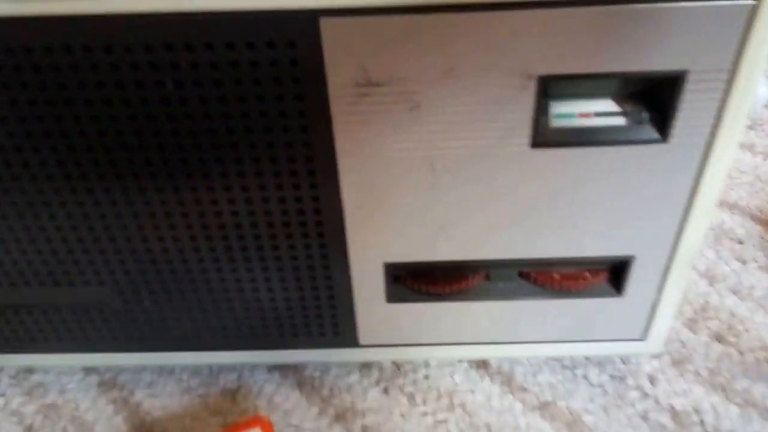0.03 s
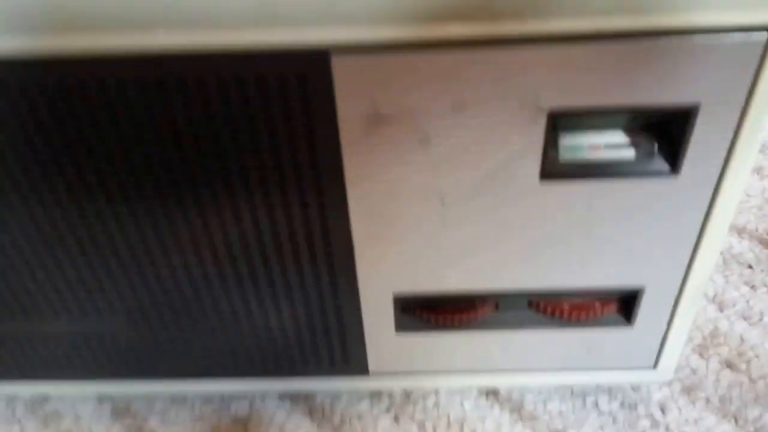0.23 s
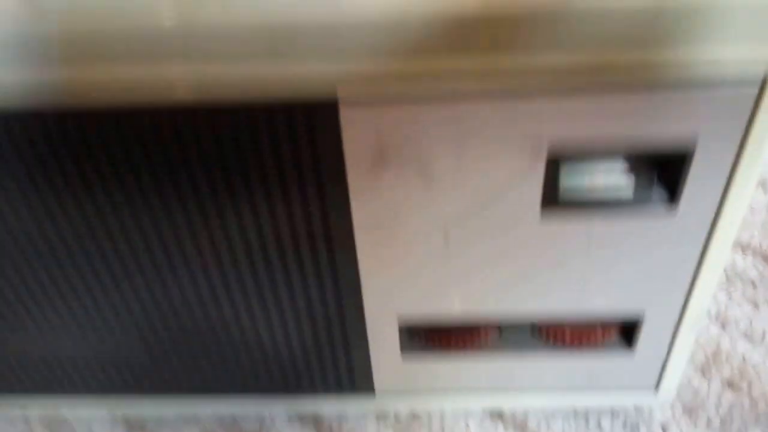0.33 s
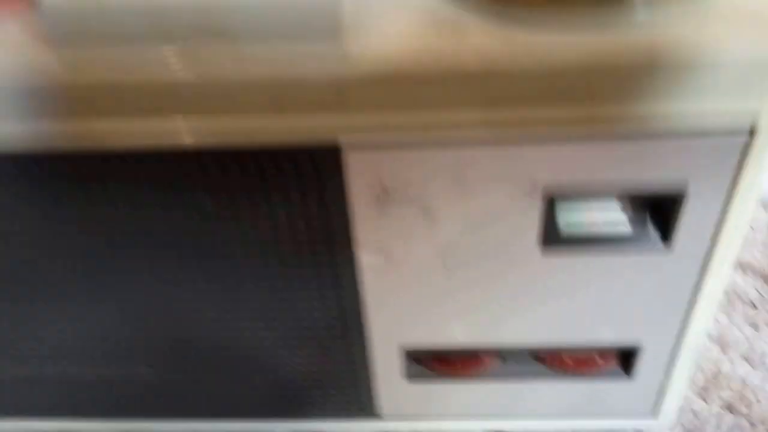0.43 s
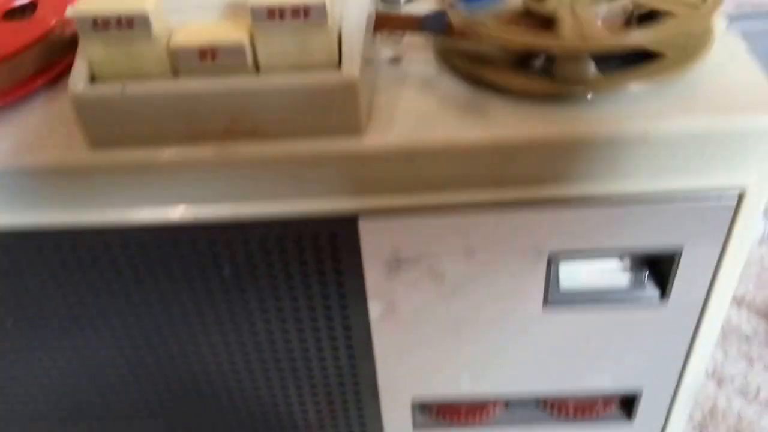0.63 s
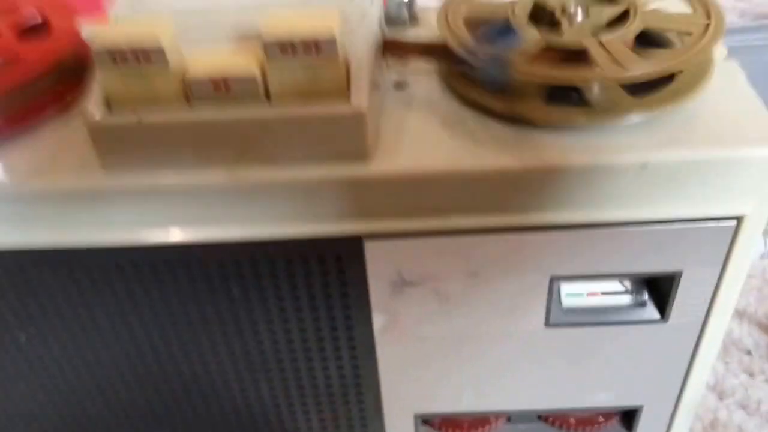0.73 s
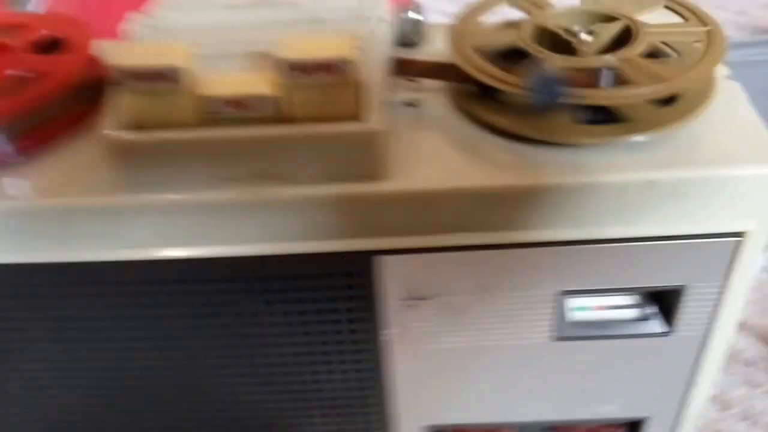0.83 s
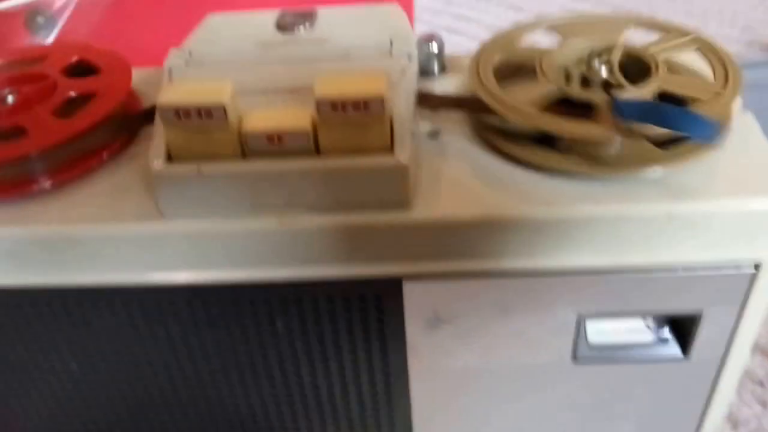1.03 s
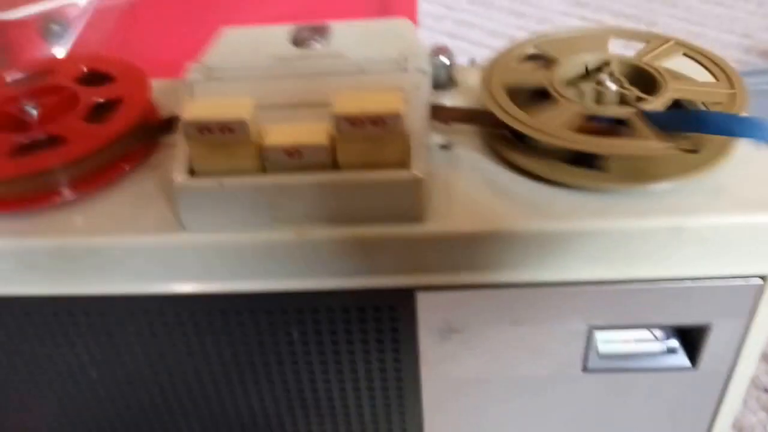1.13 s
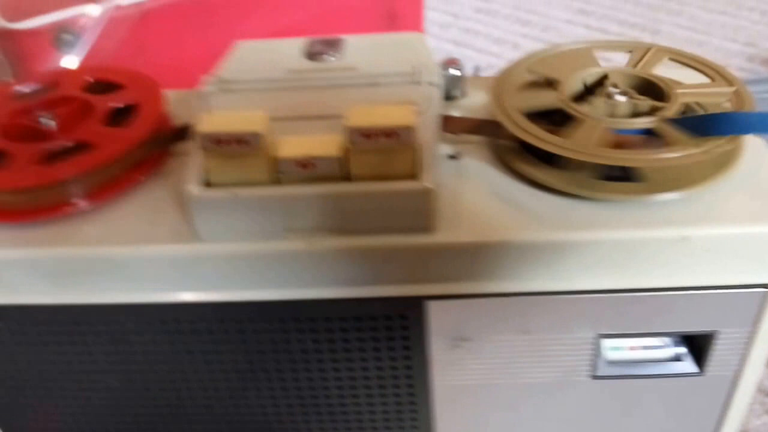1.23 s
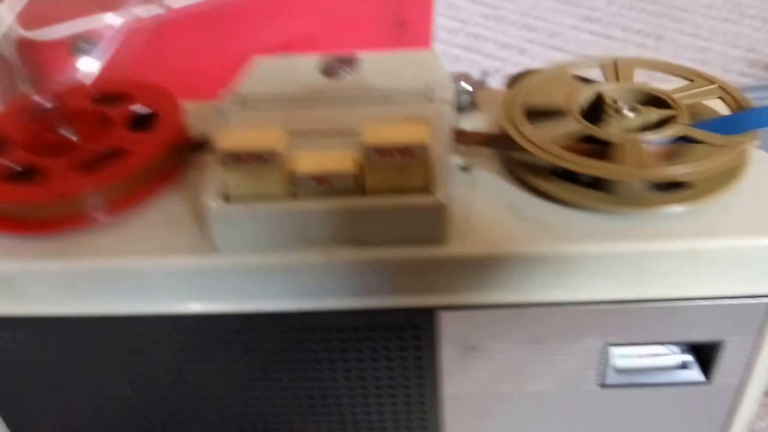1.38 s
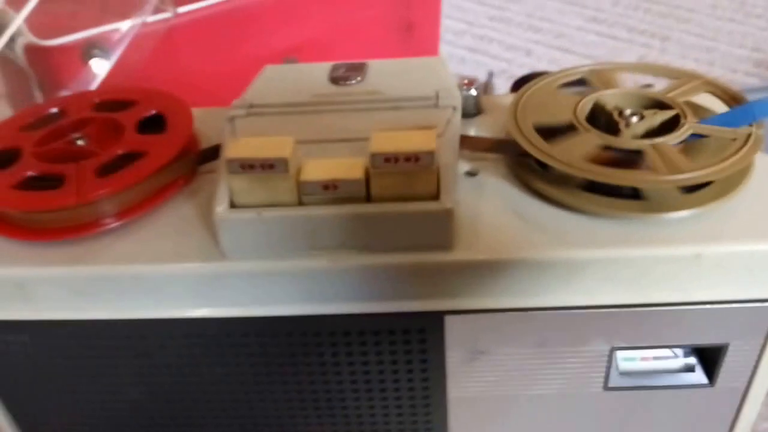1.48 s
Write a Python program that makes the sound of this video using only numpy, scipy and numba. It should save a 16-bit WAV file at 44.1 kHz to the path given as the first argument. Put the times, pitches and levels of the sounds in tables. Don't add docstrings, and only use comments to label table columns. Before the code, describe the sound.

Close indoor stereo sound of a tape machine's wavering low motor hum and rapid soft plastic knocking, with a hard click and thump on the left at a quarter second, then fainter whirr, finger ticks and light reel taps.

```python
import sys
import numpy as np
from scipy import signal
from scipy.fft import rfft, irfft
from scipy.io import wavfile
from scipy.ndimage import uniform_filter1d
from numba import njit

SR = 44100
rng = np.random.default_rng(int(sys.argv[2]) if len(sys.argv) > 2 else 0)


def nominal_scale(level):
    x = np.asarray(level, float) / 20
    return 10 ** x


def int16_out(signal):
    q = np.round(np.clip(np.atleast_2d(signal).T, -1, 1) * 32767)
    wavfile.write(sys.argv[1], SR, q.astype(np.int16))


N = 68355
T = np.arange(N) / SR
HUM_HZ = 168.95


@njit
def svf(x, hz, width):
    y, b, l = np.empty(len(x)), 0., 0.
    g, k = np.tan(np.pi * hz / SR), width / hz
    for i in range(len(x)):
        v = (b + g * (x[i] + 1e-18 - l)) / (1 + g * (g + k))
        b, l, y[i] = 2 * v - b, l + 2 * g * v, k * v
    return y


def steep(x, hz, width):
    return svf(svf(x, float(hz), float(width)), float(hz), float(width))


def unit(x):
    return x / np.sqrt(np.mean(x ** 2))


def curve(table, column=1):
    return np.interp(T, np.array(table)[:, 0], np.array(table)[:, column])


def pan(x, lr_db):
    lr_db = lr_db + np.zeros(N)
    return x * nominal_scale(np.array([np.minimum(lr_db, 0), -np.maximum(lr_db, 0)]))


def ring(x, hz, t60):
    pole = np.exp(2j * np.pi * hz / SR - np.log(1000) / (max(t60, .003) * SR))
    return signal.lfilter([1], [1, -pole], x.astype(complex)).imag


def ring_modes(x, modes):
    return sum(nominal_scale(db) * ring(x, hz, t60) for hz, db, t60 in modes)


def blows(times, gains):
    times = np.asarray(times)
    return np.bincount(np.clip(times * SR, 0, N - 1).astype(int), gains * (times >= 0), N)


def tinted(colour):
    hz, db = np.array(colour).T
    f = np.log(np.fft.rfftfreq(N, 1 / SR) + 1)
    gain = nominal_scale(np.interp(f, np.log(hz), db, right=-80))
    return unit(irfft(rfft(rng.standard_normal(N)) * gain, N))


def walk(rate):
    k = int(SR / rate)
    steps = np.repeat(rng.standard_normal(N // k + 1), k)
    return 0.82 * uniform_filter1d(uniform_filter1d(steps, k), k)[:N]


def click(s, db, hz, width_hz):
    y = steep(blows([s], [1.]), hz, width_hz)
    return y * nominal_scale(db) / np.abs(y).max()


def dull(x, hz):
    return signal.sosfilt(signal.butter(6, hz, fs=SR, output="sos"), x)


# (time [s], left level [dB], right level [dB])
HUM_LEVELS = [(0, -52, -64), (.04, -46, -56), (.08, -68, -63), (.12, -48, -55), (.3, -48, -52),
              (.45, -48, -52), (.52, -50, -57), (.72, -52, -57), (.88, -51, -53), (1.0, -54, -58),
              (1.04, -61, -58), (1.12, -61, -62), (1.17, -53, -57), (1.21, -54, -57), (1.25, -63, -62),
              (1.33, -63, -62), (1.39, -51, -52), (1.55, -64, -64)]


def hum():
    tone = np.sin(2 * np.pi * HUM_HZ * T + 0.25) * nominal_scale(0.12 + 3.3 * walk(14))
    return tone * nominal_scale(np.array([curve(HUM_LEVELS), curve(HUM_LEVELS, column=2)]))


def drive():
    repeats = .8
    turn = rng.standard_normal(int(round(SR * 13 / HUM_HZ)))
    return np.sqrt(repeats) * np.resize(turn, N) + np.sqrt(1 - repeats) * rng.standard_normal(N)


# (time [s], level [dB])
WHEEL_KNOCKS = [(-.0358, -53), (0.0413, -52.5), (0.117, -49), (0.1949, -51.5), (0.2722, -48), (0.35, -54),
                (0.4264, -54), (0.5042, -52.5), (0.5808, -54), (0.6576, -52), (0.7337, -52.5),
                (0.8114, -56), (0.888, -52.5), (0.9643, -55), (1.0425, -55.5), (1.12, -52.5), (1.1973, -57),
                (1.274, -57), (1.3511, -54.5), (1.4266, -56), (1.5049, -56)]
# (delay [s], bass level [dB], treble level [dB])
TURN_BLOWS = [
    (0, -1, 1),
    (.0065, -10, -3),
    (.0125, -14, -3.5),
    (.0275, -6, -12),
    (.042, -14.5, -14.5),
    (.055, -12.5, -16.5),
]
# (pitch [Hz], level [dB], t60 [s], left-right [dB])
CASE_LOW = [(119.7, 0.5, 0.1, -1), (267.5, -3, 0.086, -5.5), (425.3, -3, 0.12, 5), (469, 2, 0.089, 6),
            (522.5, 4, 0.1, 6.5), (545, -4.5, 0.052, 10.5), (624, 1.5, 0.11, 2.5)]
CASE_HIGH = [(858, -9.5, 0.15, -7), (1087, 3, 0.026, 5), (1231, 1.5, 0.042, 5), (1333, 0.5, 0.031, -16),
             (1514, -2, 0.014, 3), (1798, -3.5, 0.021, 6.5), (2076, -6, 0.014, 5)]
# (time [s], level [dB], extra left-right [dB])
NEARNESS = [
    (0, -61, 3),
    (.3, -60, 2.5),
    (.6, -64, 2.5),
    (.9, -70.5, 0.5),
    (1.2, -72, -1),
    (1.55, -73, -4),
]


def case():
    knocks, turn = np.array(WHEEL_KNOCKS), np.array(TURN_BLOWS)
    lead_s = .002
    times = (knocks[:, :1] + turn[:, 0] - lead_s).ravel()
    chance = rng.standard_normal((len(times), 2))
    near = curve(NEARNESS)
    bass_db = np.interp(knocks[:, :1], T, near) + turn[:, 1] + 12.5
    treble_db = knocks[:, 1:] + turn[:, 2] - 5.5
    bass = (CASE_LOW, bass_db, near - 6, curve(NEARNESS, column=2), 520, 600)
    treble = (CASE_HIGH, treble_db, -85 + 0.15 * (near - near[-1]), 3 - 3.5 * T, 1600, 3000)
    out = 0
    for modes, knock_db, whirr_db, turned_db, contact_hz, width_hz in (bass, treble):
        uneven_db = knock_db.ravel() + 1.2 * chance[:, 1]
        hits = blows(times + 0.00034 * chance[:, 0], nominal_scale(uneven_db))
        hits = steep(hits, contact_hz, width_hz)
        for k, (hz, db, t60, lr_db) in enumerate(modes):
            tilt_db = -10 * max(np.log2(hz / 1300), 0)
            whirr = unit(ring(drive(), hz, t60)) * nominal_scale(whirr_db + tilt_db + 1.2 * walk(25))
            knock = (-1) ** k * ring(hits, hz, t60)
            out = out + nominal_scale(db) * pan(knock + whirr, lr_db + turned_db)
    return out


# (time [s], left level [dB], right level [dB])
RUB_LEVELS = [(0, -51.5, -94), (.05, -66.5, -93), (.092, -55.5, -91), (.12, -66, -89), (.22, -64, -81),
              (.3, -75.5, -80), (.5, -70, -87), (.64, -73.5, -68.5), (.8, -79, -83.5), (.91, -89, -64.5),
              (.96, -69.5, -79.5), (1.03, -82, -64), (1.12, -74, -101), (1.2, -72, -69), (1.3, -77, -77)]
# (frequency [Hz], level [dB])
RUB_TINT = [(700, 7), (1500, 5), (3000, 2), (4500, 1), (6000, -5), (7000, -35), (9000, -35)]


def rub():
    return np.array([tinted(RUB_TINT) * nominal_scale(curve(RUB_LEVELS, column=c) + 2.2 * walk(90))
                     for c in (1, 2)])


# (time [s], left level [dB], right level [dB])
RUMBLE_LEVELS = [(0, -52.5, -94), (.08, -55, -96), (.2, -56, -63), (.4, -67.5, -86), (.9, -67.5, -65),
                 (1.2, -91, -70.5), (1.43, -64.5, -84), (1.55, -83, -80)]


def rumble():
    return np.array([unit(steep(rng.standard_normal(N), 95, 130)) * nominal_scale(curve(RUMBLE_LEVELS, column=c))
                     for c in (1, 2)])


def squeak():
    whine = unit(svf(rng.standard_normal(N), 4550., 120.))
    return pan(whine * nominal_scale(-76) * (T < .24), 17)


# (frequency [Hz], level [dB])
HISS_TINT = [(30, -15.5), (110, -20), (250, -10), (760, -22.5), (6700, -37), (8500, -39.5), (14800, -45.5),
             (15300, -58)]


def hiss():
    return np.array([tinted(HISS_TINT) for _ in range(2)]) * nominal_scale(-70.5)


# (time [s], peak level [dB], pitch [Hz], width [Hz], left-right [dB])
PORT_THUMPS = [
    (.2572, -19.5, 88, 78, 40),
    (.249, -25, 104, 130, 35),
    (.2665, -26.5, 48, 84, 37.5),
    (0.047, -71, 222, 62, 15),
    (0.044, -58, 47, 240, -13),
    (0.058, -45, 970, 610, 24),
    (.155, -43, 830, 860, 27),
    (0.25, -57, 110, 48, -9),
]


def thumps():
    return sum(pan(click(s, db, hz, width), lr_db) for s, db, hz, width, lr_db in PORT_THUMPS)


def tick(s, db, hz):
    y = svf(blows([s], [1.]), float(hz), 4500 * min(1., (3500 / hz) ** 2))
    y = dull(y, max(5500, 1.2 * hz))
    return y * nominal_scale(db + 6.5) / np.abs(y).max()


# (time [s], peak level [dB], pitch [Hz])
LEFT_TICKS = [(0.0657, -37, 3200), (.155, -36.5, 2230), (0.2012, -53.5, 4440), (0.506, -49.5, 6860),
              (0.546, -56.5, 6700), (0.813, -58.5, 7050), (1.123, -54, 6040), (1.182, -49, 4600),
              (1.234, -56, 3520), (1.251, -55, 3660), (1.429, -60, 7240)]
RIGHT_TICKS = [(.212, -61, 2600), (.2243, -68, 3730), (.2297, -70, 3000), (.638, -57.5, 3000),
               (.652, -59, 2980), (.753, -57, 3370), (.888, -50, 2900), (.910, -51, 3040),
               (.9145, -53.5, 2800), (1.012, -55, 3400), (1.027, -59, 2780), (1.182, -76, 3900),
               (1.234, -77, 2500), (1.251, -72, 2200), (1.348, -63, 2000), (1.39, -57, 2200),
               (1.44, -56, 2400)]


def ticks():
    left = sum(tick(*row) for row in LEFT_TICKS)
    right = sum(tick(*row) for row in RIGHT_TICKS)
    return pan(left, 24) + pan(right, -14)


# (time [s], level [dB])
CRUNCH_LEVELS = [
    (.222, -58),
    (.244, -51),
    (.249, -30),
    (.255, -26),
    (.259, -28),
    (.263, -35),
    (.266, -66),
]
# (frequency [Hz], level [dB])
CRUNCH_TINT = [(250, 2), (550, 0.5), (1000, -2.5), (2200, -8), (4200, -7.5), (6300, -8), (7500, -20.5),
               (15500, -27)]
# (time [s], peak level [dB], pitch [Hz], bright edge level [dB])
PRESS_SNAPS = [
    (.2393, -30, 3800, -40),
    (.2446, -35, 4000, -30),
    (.2483, -19, 4300, -18),
    (.2512, -26, 1300, -30),
    (.2541, -22, 3000, -22),
    (.2570, -11, 5500, -17),
    (.2602, -31, 6100, -16),
]
# (pitch [Hz], level [dB], t60 [s])
SHELL_MODES = [(520, -21, .012), (1200, -26, .016), (2460, -31, .012), (5900, -24, .013)]


def press():
    snaps = 0
    for s, db, hz, air_db in PRESS_SNAPS:
        body = dull(click(s, db + 6, hz, hz * .8), 6900)
        snaps = snaps + body + click(s, db + air_db, 10500, 10500)
    hardest_s = max(PRESS_SNAPS, key=lambda row: row[1])[0]
    shell = ring_modes(blows([hardest_s + .0006], [1.]), SHELL_MODES)
    inside = (T > CRUNCH_LEVELS[0][0]) & (T < CRUNCH_LEVELS[-1][0])
    crunch = inside * tinted(CRUNCH_TINT) * nominal_scale(curve(CRUNCH_LEVELS) + 3.5 * walk(700))
    return pan(snaps + shell + crunch, 44)


# (time [s], low ring level [dB], high ring level [dB])
RATTLE_LEVELS = [(.27, -64.5, -87), (.36, -77.5, -76), (.5, -77, -67.5), (.6, -79, -75.5),
                 (.85, -78.5, -80), (1.0, -73, -81), (1.15, -68, -77.5), (1.25, -67.5, -77),
                 (1.31, -72.5, -86), (1.36, -72, -80), (1.55, -63, -76.5)]
# (pitch [Hz], level [dB], t60 [s])
REEL_LOW = [(5470, -11.5, 0.11), (5765, 8, 0.0056), (6080, -6.5, 0.02)]
REEL_HIGH = [(4680, 12, 0.0086), (6710, 1.5, 0.038), (7130, 3, 0.023), (7300, -1.5, 0.032)]


def rattle():
    out = 0
    for column, modes, per_s, trim_db in ((1, REEL_LOW, 900, -3), (2, REEL_HIGH, 1500, 0)):
        taps = (rng.random(N) < per_s / SR) * nominal_scale(4 * rng.standard_normal(N))
        rings = unit(svf(ring_modes(taps, modes), float(modes[1][0]), 1700.))
        out = out + rings * nominal_scale(curve(RATTLE_LEVELS, column=column) + trim_db)
    return pan(out * (T > RATTLE_LEVELS[0][0]), 14)


# (time [s], peak level [dB], pitch [Hz], width [Hz], left-right [dB])
SLIDING_BUMP = [
    (1.004, -51, 140, 120, -20),
    (1.016, -47, 90, 100, -30),
    (1.03, -52, 62, 60, -30),
]


def bump():
    return sum(pan(click(s, db, hz, width), lr_db) for s, db, hz, width, lr_db in SLIDING_BUMP)


# (time [s], peak level [dB])
SINGLE_TAPS = [(1.103, -62), (1.1215, -66), (1.177, -54), (1.187, -54), (1.193, -55), (1.228, -58.5),
               (1.234, -53.5), (1.251, -55), (1.257, -56), (1.261, -57), (1.28, -60), (1.335, -57),
               (1.349, -57), (1.358, -51), (1.378, -55), (1.411, -55.5), (1.435, -52.5), (1.455, -55),
               (1.481, -61), (1.488, -53.5), (1.512, -52.5), (1.529, -56)]
# (pitch [Hz], level [dB], t60 [s])
REEL_TAP_MODES = [(5540, -4, 0.025), (5800, 0, 0.0097), (6140, -4.5, 0.007)]


def reel_taps():
    times, db = np.array(SINGLE_TAPS).T
    taps = blows(times, nominal_scale(db + 1.5))
    taps = svf(svf(taps, 5930., 2200.), 5900., 2200.)
    return pan(ring_modes(taps, REEL_TAP_MODES), 14)


def scrape():
    start_s, t60_s = 1.178, 0.27
    grit = unit(steep(rng.standard_normal(N), 4560, 3000)) * nominal_scale(5 * walk(300))
    fade_db = -60 * np.abs(T - start_s) / t60_s
    return pan(grit * nominal_scale(-62.5 + fade_db) * (T > start_s), 16)


def scene():
    machine = hum() + case() + rattle() + reel_taps()
    hands = rub() + rumble() + squeak() + thumps() + ticks() + press() + bump() + scrape()
    return machine + hands + hiss()


def low_pass(x):
    return signal.sosfilt(signal.butter(12, 16650, fs=SR, output="sos"), x)


def record(dry):
    return low_pass(dry)


dry = scene()
out = record(dry)
int16_out(out)
```